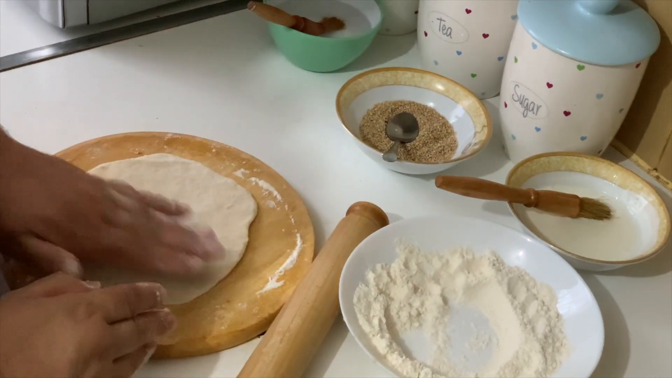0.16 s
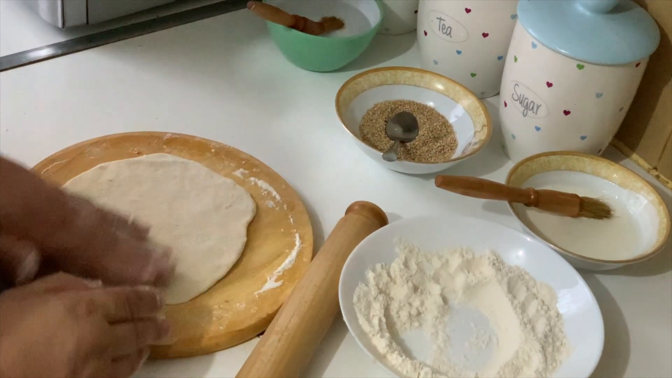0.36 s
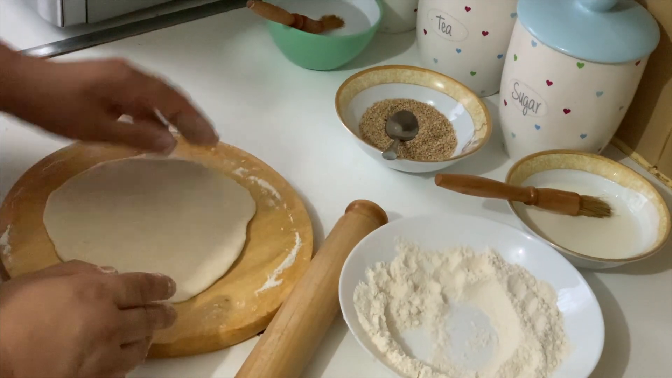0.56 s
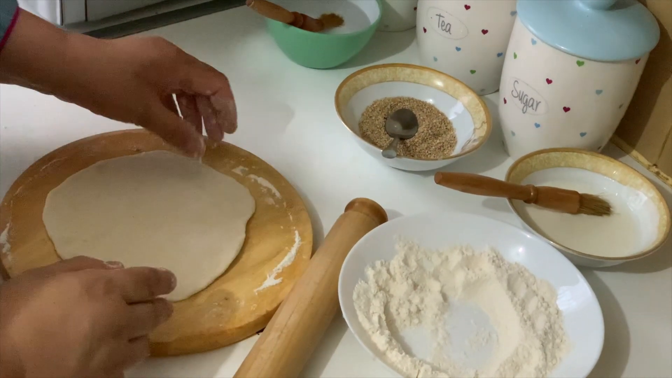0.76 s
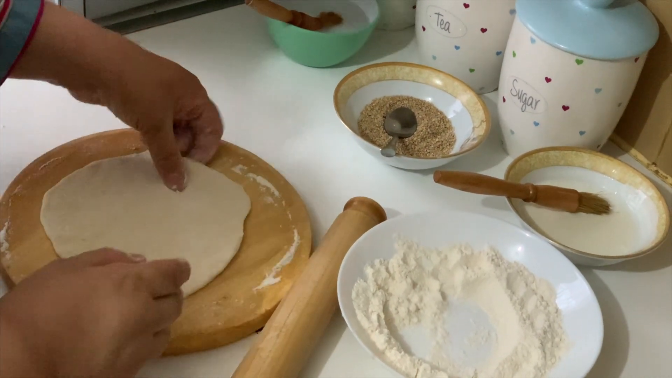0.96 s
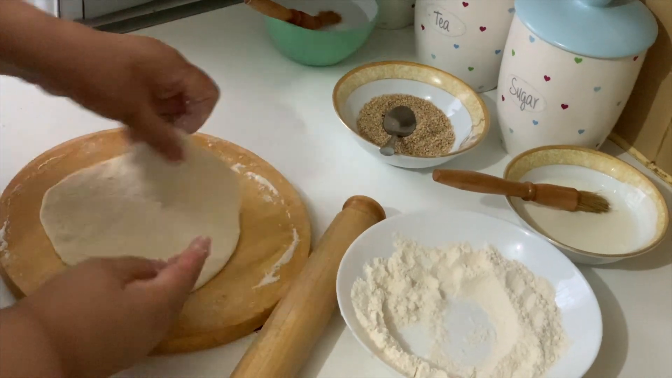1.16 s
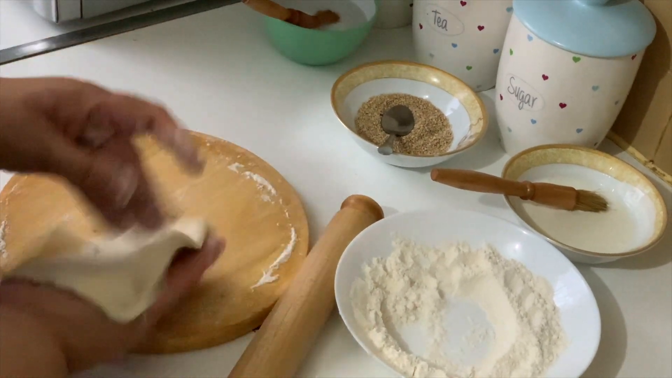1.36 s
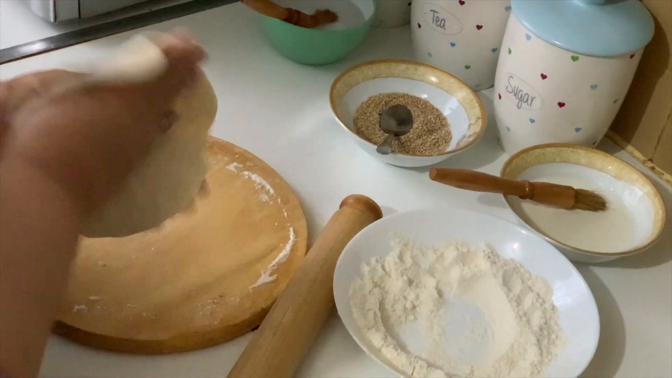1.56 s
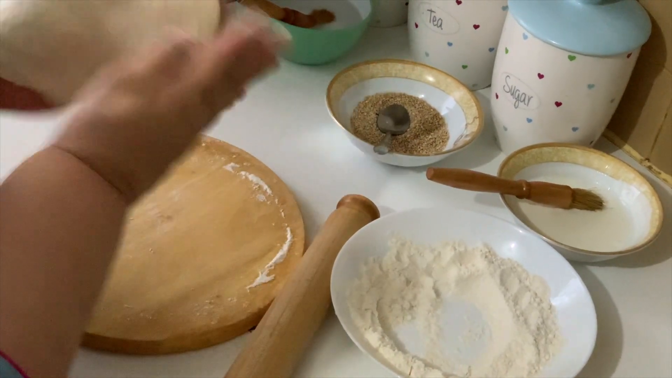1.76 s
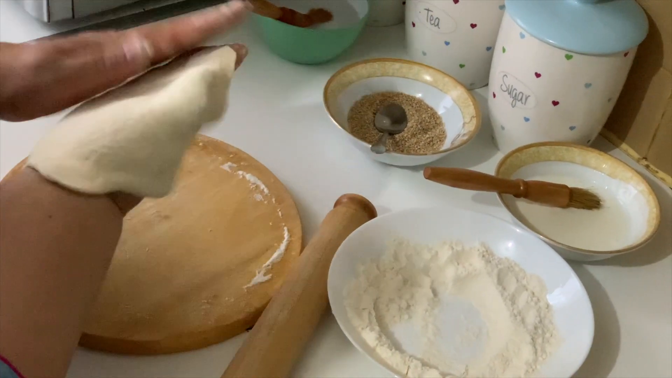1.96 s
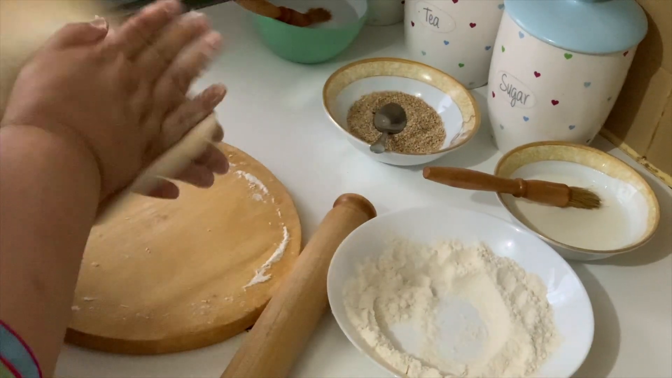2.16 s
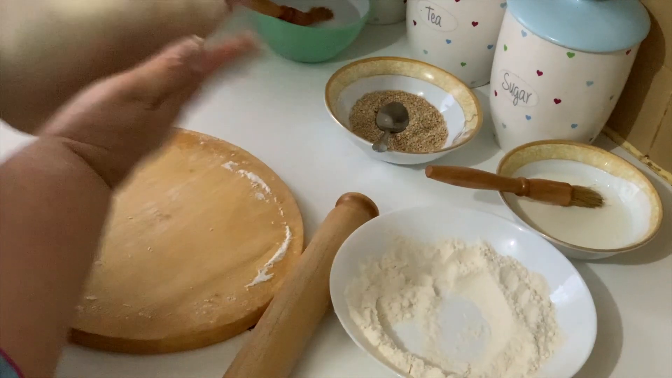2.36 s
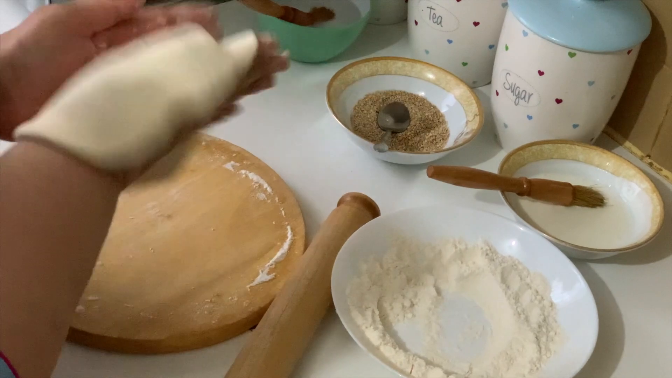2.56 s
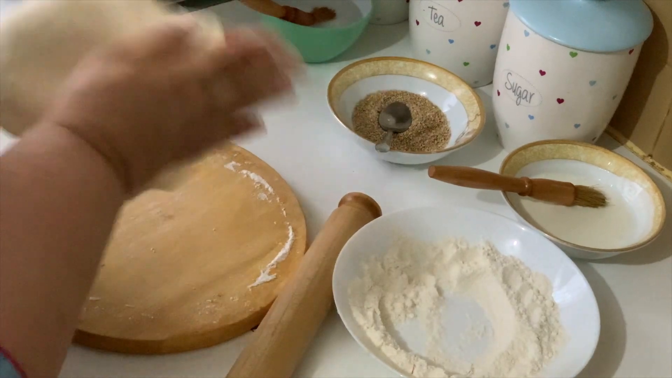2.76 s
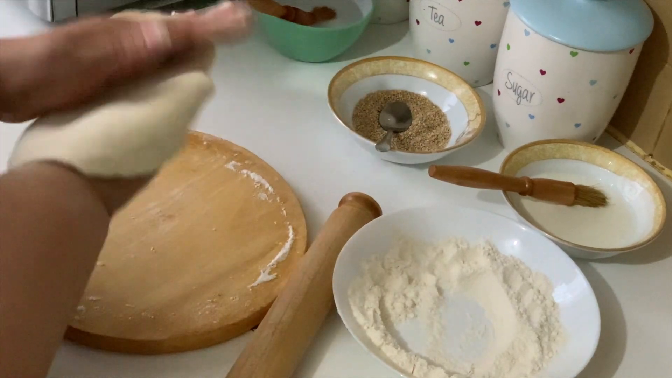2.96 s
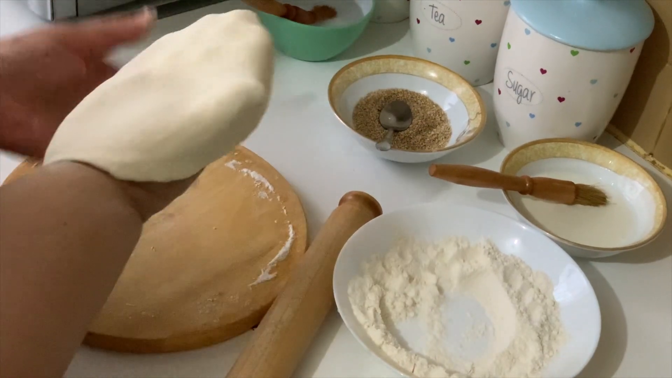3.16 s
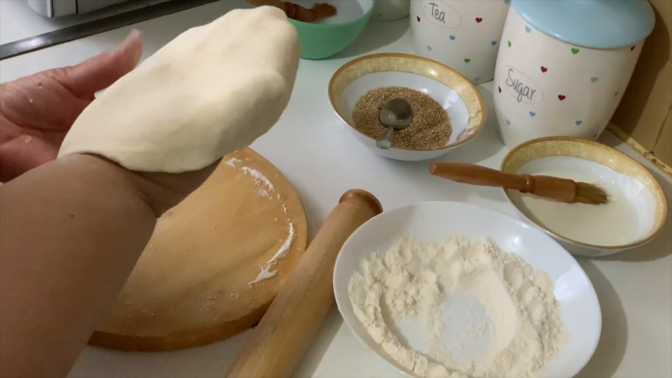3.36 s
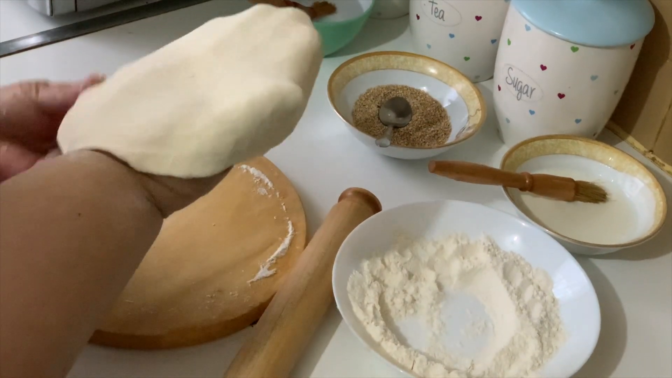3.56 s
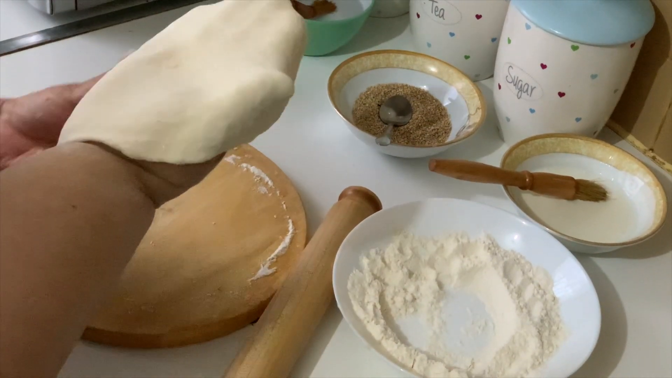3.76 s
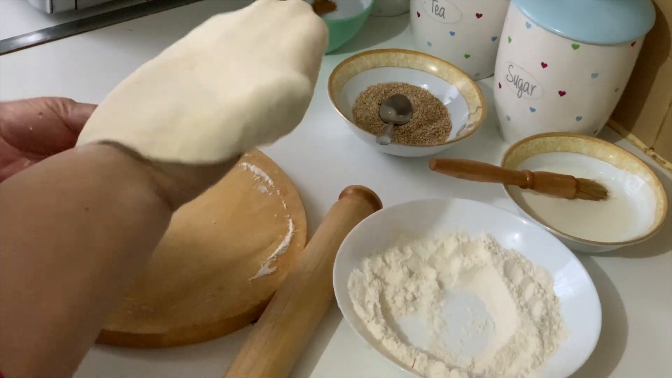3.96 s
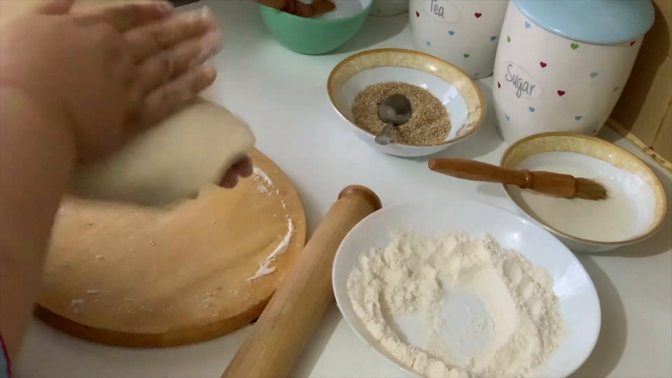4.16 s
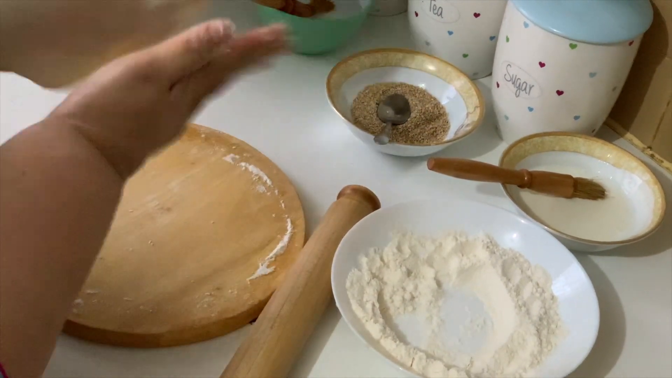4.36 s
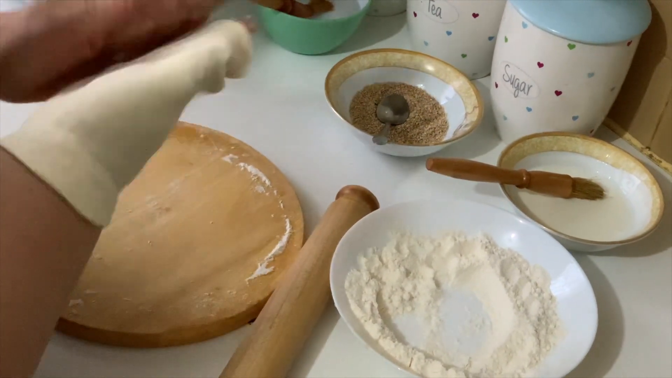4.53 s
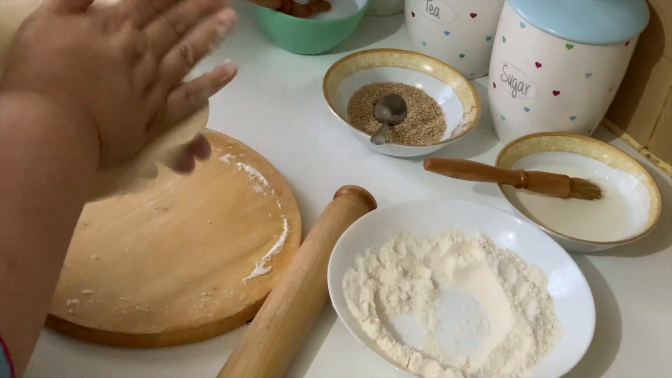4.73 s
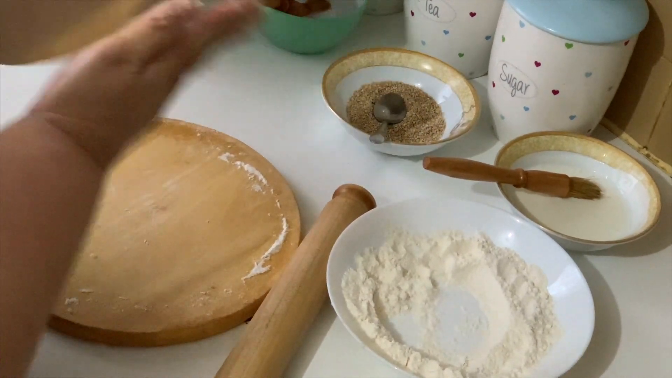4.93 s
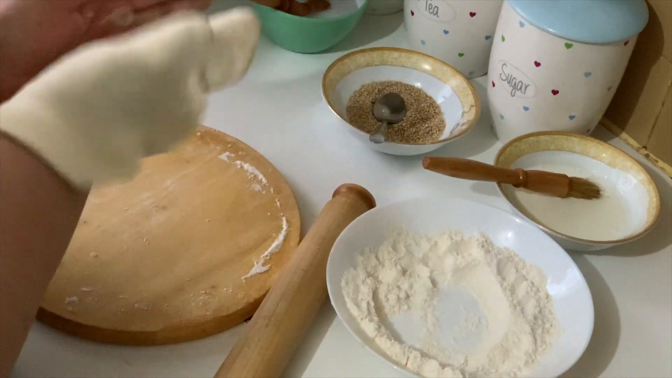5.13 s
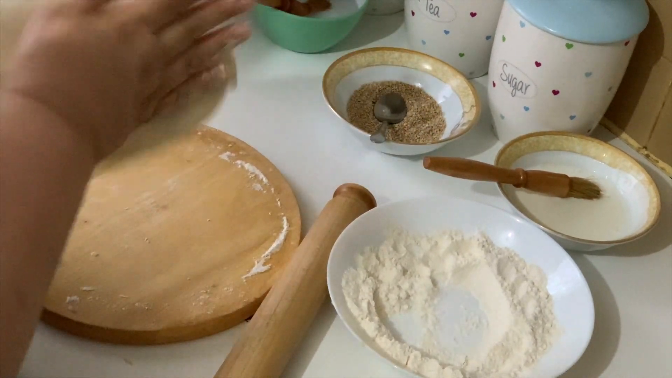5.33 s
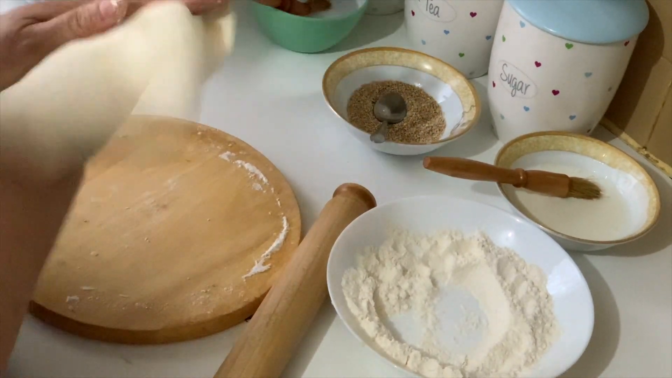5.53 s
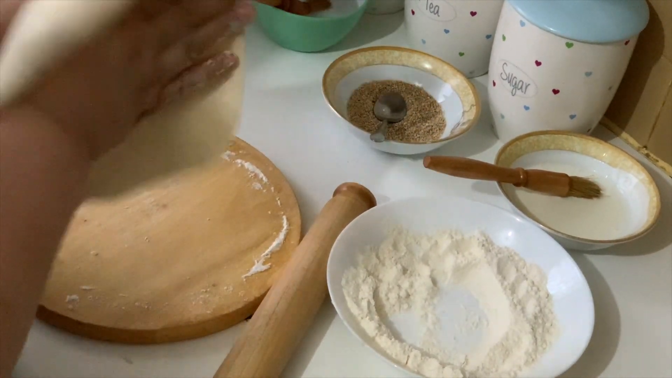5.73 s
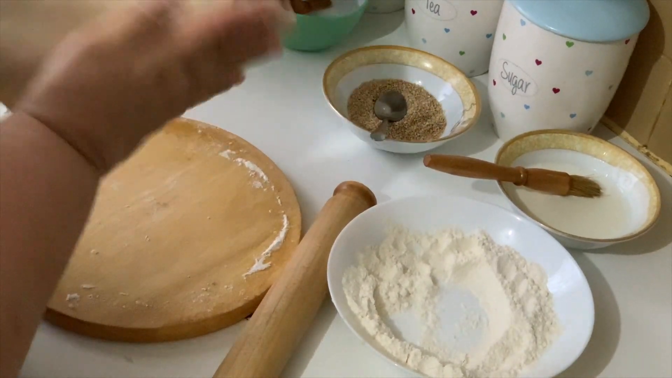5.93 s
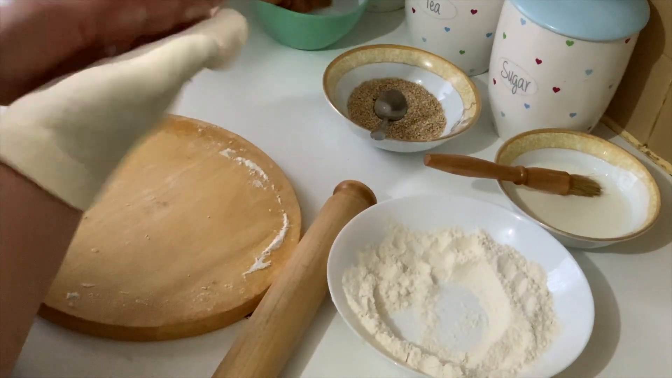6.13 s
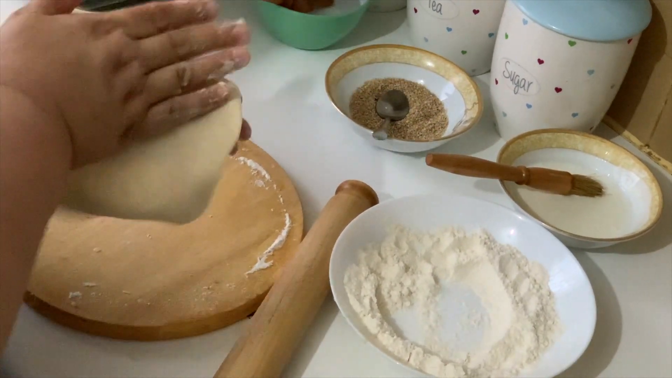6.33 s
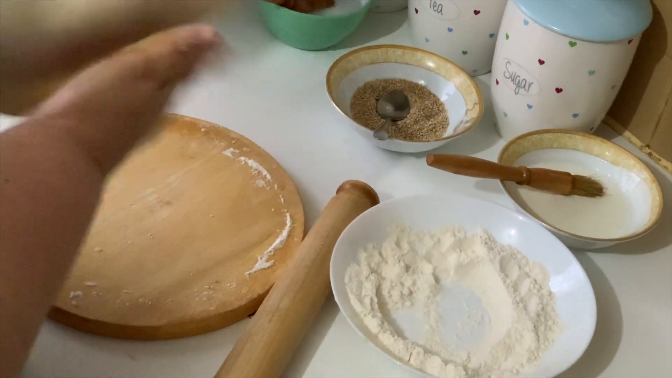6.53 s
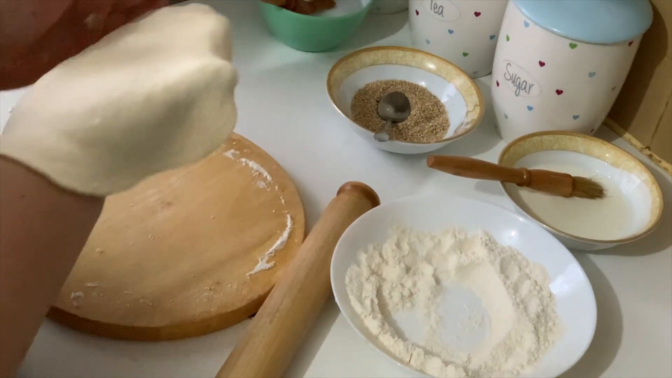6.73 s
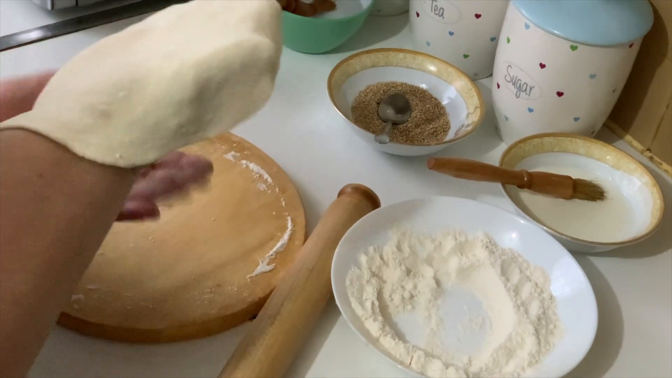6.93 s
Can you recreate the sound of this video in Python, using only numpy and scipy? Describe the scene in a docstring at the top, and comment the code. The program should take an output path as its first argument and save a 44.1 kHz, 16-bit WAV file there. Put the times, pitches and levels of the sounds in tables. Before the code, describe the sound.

Hands toss a floury sheet of dough back and forth with sharp smacks, faint rubbing and low thuds over a soft room hum.

```python
"""Soft dough is patted on a wooden board with a dull thud, swept by a hand and peeled off, then slaps
from palm to palm in two quick runs. In each toss the sheet slides off one hand, smacks the other
(squeezed air, popping pockets, a jolt in the worktop) and rubs as it settles. Floury skin hisses and
ticks, the sheet rustles low, and a small hard kitchen echoes and hums, close to a stereo microphone."""
import sys
import numpy as np
from scipy import signal
from scipy.fft import rfft, irfft, next_fast_len
from scipy.io import wavfile
from scipy.ndimage import uniform_filter1d

SR = 44100
rng = np.random.default_rng(int(sys.argv[2]) if len(sys.argv) > 2 else 0)


def unload_wav(signal):
    """Save mono or channel-first audio to the path in sys.argv[1] as 16-bit WAV at rate SR, clipped to [-1, 1]."""
    wavfile.write(
        sys.argv[1],
        SR,
        np.round(np.clip(np.atleast_2d(signal).T, -1, 1) * 32767).astype(np.int16),
    )


N = 312669
HIT_SAMPLES = 4096
HIT_TIME = (np.arange(HIT_SAMPLES) - HIT_SAMPLES // 4) / SR  # seconds from the moment of contact

# Levels are relative within each layer. Spectra and colours list: freq_hz, level_db.
# dough meets palm: contact_s, strength_db, tilt_db_per_octave, arm_weight_db, palm_db, finger_lead_s
SLAPS = [(1.615, -31.5, 1, -10, -38, 0.0073), (1.886, -24.5, 3.5, 0, -39, 0.0077),
         (2.1599, -16.5, -0.1, -17, -23.5, 0.0086), (2.404, -17, 0.3, 9, -22, 0.0079),
         (2.651, -13, -1, 9.5, -19.5, 0.0053), (2.915, -22.5, 2, 6.5, -25.5, .0085),
         (4.17, -24, 0.1, 2, -30, 0.021), (4.434, -18, 1.5, 7, -22, 0.0058),
         (4.725, -19.5, 2, 6, -28.5, 0.0072), (5.0, -21, 2.5, -1, -24.5, 0.0066),
         (5.246, -18, 0.5, 0, -30, 0.0095), (5.5202, -13.5, 1.26, 6, -27.5, 0.0062),
         (5.785, -8.5, -1.4, -11, -22, 0.002), (6.048, -13, 1, -4.5, -16.5, 0.0069),
         (6.302, -18.5, 1.5, 5, -22, 0.0066), (6.576, -18.5, 0.3, -1, -28.5, 0.0063)]
# the loose rim flops onto the hand after a slap: contact_s, strength_db
RIM_FLAPS = [(2.945, -23), (4.554, -22), (5.366, -22)]
# air trapped under the palm (low) or between fingers (high): contact_s, pitch_hz, level_db, ring_s
AIR_POCKETS = [(1.615, 1390, -33.5, 0.0045), (1.888, 1560, -33, 0.0027), (2.159, 664, -14, 0.0016),
               (2.159, 384, -20, 0.0045), (2.161, 1697, -22, 0.0017), (2.405, 543, -16, 0.0014),
               (2.404, 1871, -18, 0.00028), (2.652, 1012, -19, 0.0036), (2.654, 1700, -25.5, 0.0018),
               (2.914, 1883, -28, 0.0027), (2.944, 2900, -26, .0004), (2.948, 2093, -30.5, .0006),
               (4.169, 1092, -24, 0.0018), (4.169, 1394, -22, 0.0019), (4.169, 2900, -29.5, .0012),
               (4.434, 2046, -20, 0.0028), (4.434, 3050, -26.5, 0.00056), (4.553, 1934, -30, .0004),
               (4.723, 1007, -21, 0.0021), (4.999, 1054, -17.5, 0.0071), (5, 2058, -23.5, 0.0014),
               (5.248, 603, -18.5, 0.0037), (5.246, 1413, -22.5, 0.0012), (5.365, 2086, -33, 0.0007),
               (5.519, 2060, -18.5, 0.0024), (5.521, 1680, -30.5, 0.0017), (5.786, 576, -18.5, 0.0018),
               (5.786, 337, -33, 0.0031), (5.7845, 1093, -18, 0.0016), (6.049, 415, -14, 0.00091),
               (6.05, 855, -17, 0.0003), (6.05, 1468, -16.5, 0.00027), (6.302, 1284, -25, 0.0029),
               (6.576, 1257, -27, 0.0019)]
SLAP_AIR_SPECTRUM = [(30, -2), (213, 6.5), (561, 11), (1470, 9.5), (3800, 0), (9500, -5.5), (16000, -17)]  # air squeezed out by the palm
FLAP_AIR_SPECTRUM = [(213, -16), (561, -7), (1470, 9), (3000, 4), (4200, 2), (6000, -7), (16000, -19)]  # air squeezed out by the rim
# soft blows on the worktop: start_s, level_db, pitch_hz, damping_s (shorter chokes the ring more)
THUDS = [(0.038, -30, 62, .5), (0.285, -12.5, 78, .5), (0.284, -11.5, 180, 0.17),
         (0.84, -31.5, 166.5, 0.11), (1.626, -30, 76, 0.23), (1.806, -36, 56.5, .6), (4.772, -20, 79, 0.68),
         (4.804, -22.5, 92, .2), (4.913, -23.5, 65, 0.14), (4.983, -24, 80, 0.38), (6.603, -18, 108, 0.44),
         (6.699, -16.5, 74, 0.032), (6.761, -20, 117, 0.072), (6.809, -24, 95, 0.018)]
# the worktop's resonances: pitch_hz, level_db, t60_s
WORKTOP_MODES = [(56, 3, .3), (113, -8, .24), (168, -2, .2), (238, -12, .25)]
BOARD_SPECTRUM = [(200, 6.5), (380, 0), (600, 2), (800, 6.5), (1400, -2.5), (2100, -10), (3200, -26),
                  (8000, -31), (16000, -60)]  # the wooden knock
# a flat hand's stroke across the sheet: time_s, level_db
SWEEP_ENVELOPE = [(0.47, -68), (0.505, -59), (0.515, -46), (0.565, -43), (0.588, -36), (0.612, -35.5),
                  (0.64, -50), (0.74, -50), (0.86, -70)]
SWEEP_SPECTRUM = [(250, -11.5), (550, 4.5), (900, 5.5), (1500, -1.5), (2300, 2), (3100, 5.5), (3800, -0.5),
                  (4800, -1), (6000, -6), (10000, -12), (16000, -42)]  # the swish of that stroke
# skin slides over floury dough: peak_s, level_db, width_s, tilt_db_per_octave
BRUSHES = [(0.281, -43.5, 0.013, 0), (0.937, -48.5, .045, 2.5), (1.247, -53, 0.26, 2),
           (1.334, -38, 0.017, 5), (1.698, -45, 0.035, 5.5), (3.27, -56.5, 0.081, -2.5),
           (3.58, -53.5, 0.051, 0.5), (3.992, -48, 0.025, 10), (4.811, -37.5, 0.038, 1.5),
           (6.71, -40, 0.015, 8), (6.859, -50.5, 0.055, -6)]
FLOUR_SPECTRUM = [(200, -11), (550, -10), (900, -12), (1600, 9), (3000, 5), (4800, -0.5), (6500, 1.5),
                  (10000, -1), (14500, -17), (16000, -10.5)]  # the hiss of flour under skin
# how hard the tossed sheet drags on the skin: time_s, boost_db
SKIN_DRAG = [(2.2, 25), (2.9, 5), (4.3, 26), (5.3, 26), (6.5, 20.5)]
# sticky skin and fingertips on dough: contact_s, level_db, centre_hz
TICKS = [(0.5705, -26.5, 4230), (0.5778, -26, 4200), (0.588, -39, 2480), (0.609, -33.5, 4040),
         (0.834, -33.5, 1210), (0.916, -37, 4000), (0.927, -45, 3000), (1.431, -39.5, 5180),
         (1.913, -28.5, 7160), (1.99, -24, 670), (2.674, -48, 6000), (5.5198, -4.5, 4730),
         (5.527, -22, 4500), (5.777, -10, 3000), (5.789, -7.5, 4550), (6.05, -10, 4250), (6.573, -16, 4470)]
# the sheet drags on the board or bends on the hand: peak_s, level_db, width_s, upper_edge_hz
FLEXES = [(0.135, -50, 0.012, 120), (0.44, -43, 0.029, 105), (0.509, -45, 0.025, 108),
          (0.49, -43, 0.011, 260), (0.865, -52, 0.032, 249), (0.932, -40, 0.021, 258),
          (1.048, -53.5, 0.13, 292), (2.002, -61, 0.051, 430), (2.077, -38.5, 0.021, 423),
          (3.211, -50.5, 0.13, 350), (4.86, -38, 0.043, 426), (6.622, -42.5, .017, 430),
          (6.759, -50, .036, 395)]
# the kitchen's decay: freq_hz, t60_s
ROOM_DECAY = [(100, 0.036), (260, 0.38), (700, 0.31), (1840, 0.34), (4850, 0.33), (12800, 0.22)]
ROOM_COLOUR = [(100, 5), (160, -1.5), (240, -1.5), (400, 1.5), (1000, 1.5), (2100, 4.5), (3200, 3),
               (6000, -3.5), (14000, -11.5)]  # the tone of its echoes
HUM_SPECTRUM = [(20, -26), (35, -20), (60, 4), (110, -3.5), (200, -3), (300, -4), (520, -9), (1050, -2.5),
                (1500, -11.5), (2200, -23), (4500, -32.5), (6500, -37.5), (9500, -35.5), (12500, -43),
                (15500, -43)]  # its steady rush
# stereo image of the echoes and of the hum: freq_hz, left_right_likeness (held within -1 to 1 in use)
ROOM_LIKENESS = [(120, 0.99), (300, 0.49), (600, 0.3), (1200, 0.032), (2200, -0.12), (4200, 0.034),
                 (8000, 0.67), (15000, -2.15)]
HUM_LIKENESS = [(60, 0.84), (130, 0.93), (290, 0.73), (640, 0.19), (1400, -0.15), (3100, -0.61),
                (7000, 0.47), (15000, -0.73)]
# a presence peak and a lift of the top treble that brighten the whole sound: freq_hz, level_db
BRIGHT_COLOUR = [(2100, 0), (2700, -.5), (3700, 0), (4500, 2), (5700, 0), (10000, .5), (12500, 5),
                 (16000, 5.5)]


def slaps():
    """Squeezed air, popping pockets and the palm's low push fuse into a smack; rim flaps have no palm."""
    track = np.zeros(N)
    tilt_from_hz, pivot_hz, tilt_to_hz = 980, 1430, 9250
    for s, db, tilt_db, _, palm_db, lead_s in SLAPS:
        tilt = lambda hz: amp(tilt_db * np.log2(np.clip(hz, tilt_from_hz, tilt_to_hz) / pivot_hz))
        air = squeezed_air(db, lambda hz: amp(along(SLAP_AIR_SPECTRUM, hz)) * tilt(hz), lead_s)
        palm = amp(palm_db) * pop(hz=237.6, rise_s=0.001, fall_s=0.0045)
        add(track, s + HIT_TIME[0], blend([air, palm, *pockets(s)], width_hz=50))
        add(track, s, amp(db - 27) * tilt(tilt_to_hz) * peeling(peak_s=0.03))
    for s, db in RIM_FLAPS:
        air = squeezed_air(db, eq(FLAP_AIR_SPECTRUM), lead_s=0.0049)  # the rim's edge lands first
        add(track, s + HIT_TIME[0], blend([air, *pockets(s)], width_hz=50))
    return track


def squeezed_air(db, colour, lead_s):
    """Air hisses out of the closing gap from the first touch on; its low body comes with the contact."""
    usual_db, split_hz = -4, 1120
    closing_s = 0.0096 * amp(0.24 * (usual_db - db))  # harder slaps close the gap faster
    low_share = lambda hz: 1 / (1 + (hz / split_hz) ** 4)
    body = burst(rise_s=0.15 * closing_s, fall_s=0.0053, spikiness=0.5)
    body = filtered(body, lambda hz: np.sqrt(low_share(hz)))
    hiss = burst(rise_s=closing_s, fall_s=.0035, spikiness=.35)
    hiss = filtered(hiss, lambda hz: np.sqrt(1 - low_share(hz)))
    touching = np.interp(HIT_TIME + lead_s, [-.001, .0005], [.15, 1])
    return amp(db) * touching * filtered(body + hiss, colour)


def pockets(contact_s):
    """Each air pocket in a contact rings hollow, rising as it shrinks, rough as its soft walls flutter."""
    rings = []
    for s, pitch_hz, db, ring_s in AIR_POCKETS:
        if abs(s - contact_s) < .012:
            flutter_band = lambda hz: hz / pitch_hz / (1 + (hz / pitch_hz / .25) ** 4)
            flutter = unit(filtered(rng.standard_normal(HIT_SAMPLES), flutter_band))
            note = pop(pitch_hz, rise_s=0.00068, fall_s=ring_s, glide=.1) * (1 + .55 * flutter)
            rings.append(amp(db) * np.roll(unit_hit(note), round((s - contact_s) * SR)))
    return rings


def peeling(peak_s):
    """Fine crackle as floury dough settles and lets go of the skin after a slap."""
    t = np.arange(SR // 4) / SR
    grains = specks(len(t), per_s=1500)
    crackle = unit(filtered(grains, lambda hz: amp(along(FLOUR_SPECTRUM, hz)) * np.sqrt(hz)))
    return crackle * t / peak_s * np.exp(1 - t / peak_s)


def pat():
    """The flat hand knocks the board through the dough: one dull, woody hit."""
    track, contact_s = np.zeros(N), .287
    knock = filtered(burst(rise_s=0.002, fall_s=0.0021, spikiness=0.096), eq(BOARD_SPECTRUM))
    add(track, contact_s + HIT_TIME[0], amp(-18.5) * unit_hit(knock))
    return track


def thuds():
    """Soft blows and the jolt of each slap swing the worktop, most in the modes near the push's pitch."""
    track, t = np.zeros(N), np.arange(SR // 2) / SR
    jolt_hz, jolt_damping_s, bloom_s = 91.6, 0.2, 0.046
    jolts = [(s, -28.5 + 0.27 * db + arm_db, jolt_hz, jolt_damping_s) for s, db, _, arm_db, *_ in SLAPS]
    for s, db, push_hz, damping_s in THUDS + jolts:
        ring = np.zeros(len(t))
        for hz, mode_db, t60_s in WORKTOP_MODES:
            driven_db = mode_db - 9.6 * abs(np.log2(hz / push_hz))
            lost_db = 60 * t * (1 / t60_s + 0.049 / damping_s)  # by itself and into what presses on it
            ring += amp(driven_db - lost_db) * np.sin(2 * np.pi * hz * rng.normal(1, 0.045) * t)
        add(track, s, amp(db + 6.5) * ring * (1 - np.exp(-t / bloom_s)))
        push = pop(push_hz, rise_s=0.001, fall_s=0.008)
        add(track, s + 0.00714 + HIT_TIME[0], amp(db - 3.5) * push)
    return filtered(track, lambda hz: 1 - 1 / (1 + (hz / 41) ** 6))  # low cut


def sweep():
    """The palm presses into its stroke over the sheet and lifts off: a swish full of flour specks."""
    speck_share = .65  # of the power
    coarse = np.sqrt(speck_share) * unit(specks(N, per_s=600))
    fine = np.sqrt(1 - speck_share) * rng.standard_normal(N)
    swish = unit(filtered(coarse + fine, eq(SWEEP_SPECTRUM)))
    level_db = np.interp(np.arange(N) / SR, *np.transpose(SWEEP_ENVELOPE), left=-120, right=-120)
    return swish * amp(level_db)


def brushes():
    """Skin over flour: a grainy hiss, brighter when it skims. Every toss adds a slide and a rub."""
    track, t = np.zeros(N), np.arange(-SR // 2, SR // 2) / SR
    strokes = list(BRUSHES)
    for s, *_ in SLAPS:
        drag_db = np.interp(s, *np.transpose(SKIN_DRAG))
        strokes.append((s - .035, drag_db - 73.5, 0.044, 1.8))  # slides off one hand
        strokes.append((s + .088, drag_db - 62, 0.005, 3.8))  # rubs the other as it settles
    for s, db, width_s, tilt_db in strokes:
        touching = np.abs(t) < 4 * width_s
        grains = np.exp(.6 * unit(uniform_filter1d(rng.standard_normal(len(t)), 40)))
        friction = grains * rng.standard_normal(len(t))
        colour = lambda hz: amp(along(FLOUR_SPECTRUM, hz) + tilt_db * np.log2(hz + 100))
        hiss = unit(filtered(friction[touching], colour))
        add(track, s + t[touching][0], amp(db - 4.5) * hiss * swell(t[touching], width_s))
    return track


def ticks():
    """Sticky skin, and fingertips landing just ahead of the palm: tiny snaps of broad-band noise."""
    track, fingertip_hz = np.zeros(N), 3500
    fingertips = [(s - lead_s, db - 18, fingertip_hz) for s, db, *_, lead_s in SLAPS]
    for s, db, centre_hz in TICKS + fingertips:
        snap = burst(rise_s=.0005, fall_s=.0012, spikiness=.2)
        band = lambda hz: hz * centre_hz / (hz ** 2 + centre_hz ** 2) / (1 + (hz / centre_hz / 1.5) ** 4)
        add(track, s + HIT_TIME[0], amp(db - 12.5) * unit_hit(filtered(snap, band)))
    return track


def flexing():
    """The sheet rumbles as it drags on the board and gives a hollow low rustle as it swings."""
    track, t = np.zeros(N), np.arange(-SR // 2, SR // 2) / SR
    for s, db, width_s, edge_hz in FLEXES:
        low_cut = lambda hz: (hz / edge_hz) ** 2 / (.16 + (hz / edge_hz) ** 2)
        band = lambda hz: low_cut(hz) / np.sqrt(1 + (hz / edge_hz) ** 10)
        rumble = unit(filtered(rng.standard_normal(len(t)), band))
        add(track, s + t[0], amp(db) * rumble * swell(t, width_s))
    return track


def kitchen(hands):
    """Direct sound, a touch to the left, plus echoes; the hands move, so each slap gets a new pattern."""
    heard = np.zeros((2, N))
    margin, left_lead_s = 64, .000218  # the margin (samples) leaves room for the earlier left channel
    impulse = 1. * (np.arange(SR // 2) == margin)
    from_left = lambda hz: np.exp(1j * np.pi * hz * left_lead_s * np.array([[1], [-1]]))
    direct = amp(-4.5) * filtered(impulse, from_left)
    cuts = [0, *(round(s * SR) - HIT_SAMPLES // 4 for s, *_ in SLAPS), N]
    for start, end in zip(cuts, cuts[1:]):
        echoes = amp(-0.5) * np.roll(room_tail(early_db=7.5), margin, axis=1)
        paths = blend([direct, echoes], width_hz=60)
        add(heard, (start - margin) / SR, signal.fftconvolve(hands[None, start:end], paths, axes=1))
    return heard


def room_tail(early_db):
    """Dense echoes, strongest at first from the worktop and the near wall."""
    n = SR // 2
    hz, frame_s, bands = signal.stft(stereo_noise(n, ROOM_LIKENESS), SR, nperseg=256)
    decay = amp(-60 * frame_s / along(ROOM_DECAY, hz)[:, None])
    tail = signal.istft(bands * decay, SR, nperseg=256)[1][:, :n]
    t = np.arange(n) / SR
    onset = (1 - np.exp(-t / .001)) * (1 + amp(early_db) * np.exp(-t / .008))
    tail = whiten(tail * onset, width_hz=40)
    return filtered(tail / np.sqrt(np.sum(tail ** 2) / 2), eq(ROOM_COLOUR))


def hum():
    """The steady low rush of the kitchen."""
    return amp(-46) * unit(filtered(stereo_noise(N, HUM_LIKENESS), eq(HUM_SPECTRUM)))


def burst(rise_s, fall_s, spikiness):
    """Many tiny contacts that swell up to the hit and die after it."""
    envelope = np.exp(-np.where(HIT_TIME < 0, np.abs(HIT_TIME / rise_s) ** 1.3, HIT_TIME / fall_s))
    sizes = np.repeat(np.exp(spikiness * rng.standard_normal(HIT_SAMPLES // 16)), 16)
    return unit_hit(whiten(envelope * sizes * rng.standard_normal(HIT_SAMPLES), width_hz=130))


def pop(hz, rise_s, fall_s, glide=0.):
    """A damped tone that builds just before the contact; glide bends its pitch upward."""
    before = np.exp(np.minimum(-HIT_TIME / rise_s, 60))
    after = np.exp(np.minimum(HIT_TIME / fall_s, 60))
    pitch_hz = hz * (1 + glide * np.tanh(HIT_TIME / fall_s - .5))
    phase = 2 * np.pi * np.cumsum(pitch_hz) / SR + rng.uniform(0, 2 * np.pi)
    return unit_hit(np.sin(phase) / (before + after))


def specks(n, per_s):
    """Scattered clicks of random size."""
    return (rng.random(n) < per_s / SR) * rng.standard_normal(n)


def stereo_noise(n, likeness):
    """White noise whose stereo width changes with frequency."""
    angle = lambda hz: np.arccos(np.clip(along(likeness, hz), -1, 1)) / 2
    mid_side_gains = lambda hz: np.array([np.cos(angle(hz)), np.sin(angle(hz))])
    mid, side = filtered(rng.standard_normal((2, n)), mid_side_gains)
    return np.array([mid + side, mid - side])


def blend(parts, width_hz):
    """Layer short sounds so that their powers add and no band cancels out."""
    n = parts[0].shape[-1]
    spectra = rfft(np.array(parts), 2 * n)
    bins = round(width_hz * 2 * n / SR)
    smooth = lambda power: np.abs(uniform_filter1d(np.atleast_2d(power).mean(0), bins)) + 1e-12
    wanted_power = smooth((np.abs(spectra) ** 2).sum(0))
    summed_power = smooth(np.abs(spectra.sum(0)) ** 2)
    log_gain = np.log(wanted_power / summed_power) / 2
    # minimum phase keeps the attack sharp
    causal = irfft(log_gain) * np.r_[1, np.full(n - 1, 2), 1, np.zeros(n - 1)]
    return irfft(spectra.sum(0) * np.exp(rfft(causal)))[..., :n]


def whiten(x, width_hz):
    """Level out the chance peaks and dips in the spectrum of a short noise."""
    n = x.shape[-1]
    spectrum = rfft(x, 2 * n)
    power = np.atleast_2d(np.abs(spectrum) ** 2).mean(0)
    for _ in range(2):
        power = uniform_filter1d(power, max(1, round(width_hz * 2 * n / SR)))
    return irfft(spectrum / np.sqrt(np.abs(power) + 1e-12))[..., :n]


def swell(t, width_s):
    """A smooth rise and fall around t = 0."""
    return np.exp(-(t / width_s) ** 2 / 2)


def amp(db):
    """Decibels to gain."""
    return 10 ** (np.asarray(db) / 20)


def unit(x):
    """Scale to rms 1."""
    return x / np.sqrt(np.mean(x ** 2) + 1e-20)


def unit_hit(x):
    """Scale a short sound to the energy of 10 ms at rms 1."""
    return x / np.sqrt(np.sum(x ** 2) / (SR / 100) + 1e-20)


def along(points, hz):
    """Read (freq_hz, value) points on a log frequency axis."""
    freqs, values = np.transpose(points)
    return np.interp(np.log(hz + 1), np.log(freqs + 1), values)


def eq(points):
    """An EQ curve through (freq_hz, level_db) points."""
    return lambda hz: amp(along(points, hz))


def filtered(x, response):
    """Shape x with a gain that depends on frequency."""
    n = x.shape[-1]
    padded = next_fast_len(n + HIT_SAMPLES)
    return irfft(rfft(x, padded) * response(np.fft.rfftfreq(padded, 1 / SR)), padded)[..., :n]


def add(track, start_s, sound):
    """Mix a sound into a track from start_s on."""
    i = round(start_s * SR)
    part = sound[..., max(-i, 0):max(N - i, 0)]
    track[..., max(i, 0):max(i, 0) + part.shape[-1]] += part


def scene():
    """Hands near the microphone, the worktop leaning slightly right, the room around."""
    hands = slaps() + pat() + sweep() + brushes() + ticks() + flexing()
    return kitchen(hands) + thuds() * amp([[-1.2], [1.2]]) + hum()


def record(dry):
    """A presence peak and top treble lift brighten it all; the hardest slaps flatten; a 16 kHz cut."""
    bright = filtered(dry, eq(BRIGHT_COLOUR))
    soft_clipped = bright / (1 + np.abs(bright) ** 8) ** (1 / 8)
    return filtered(soft_clipped, lambda hz: 1 / (1 + (hz / 16000) ** 120))


dry = scene()
out = record(dry)
unload_wav(out)
```